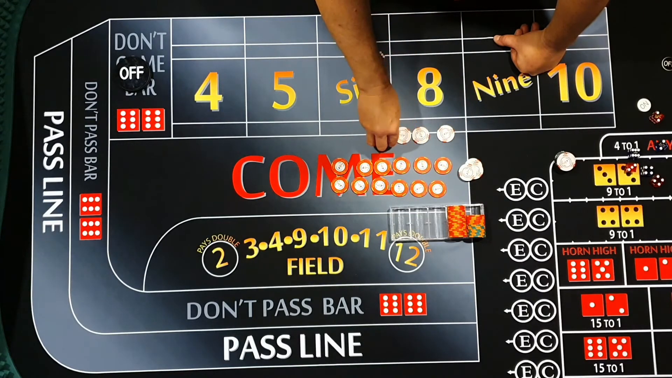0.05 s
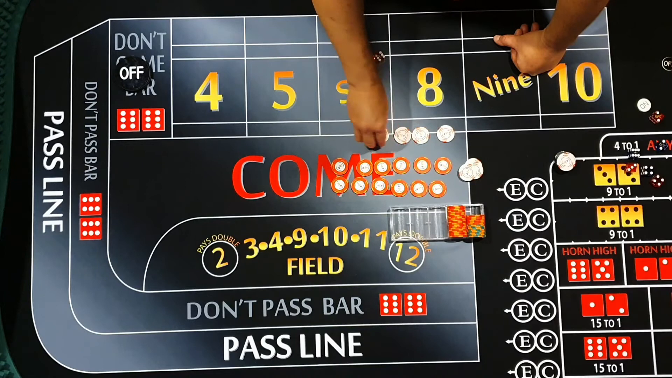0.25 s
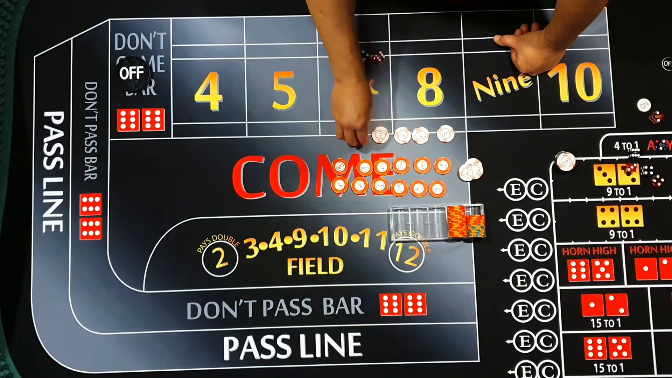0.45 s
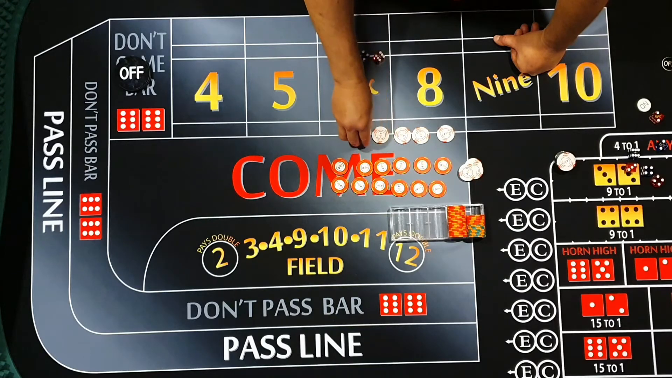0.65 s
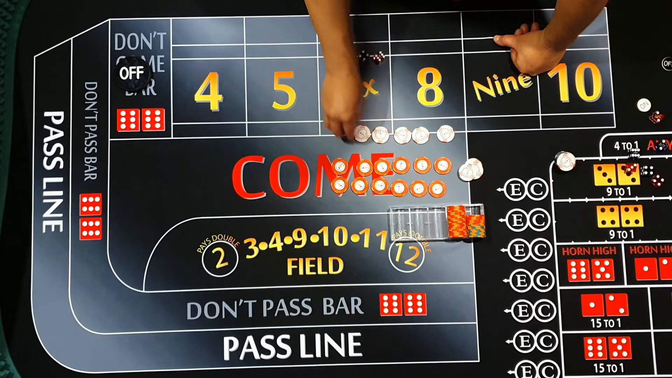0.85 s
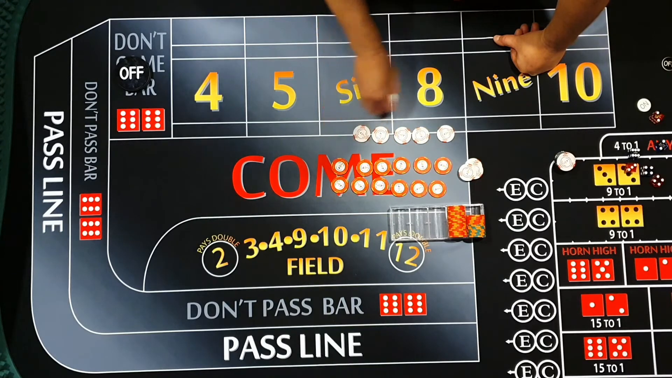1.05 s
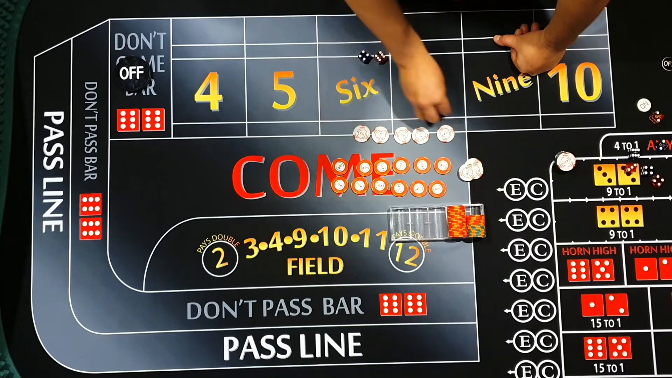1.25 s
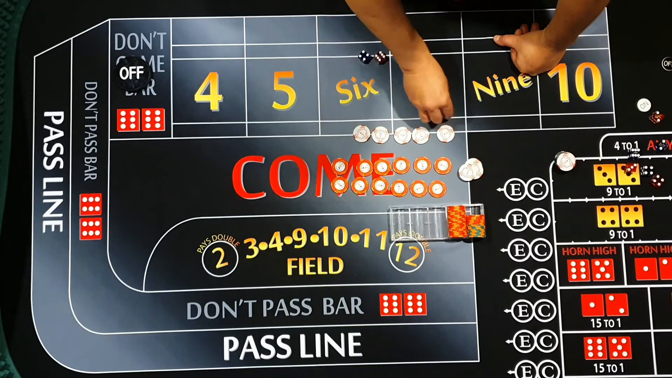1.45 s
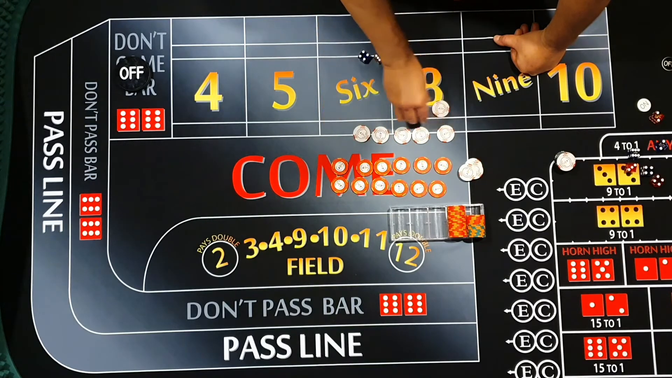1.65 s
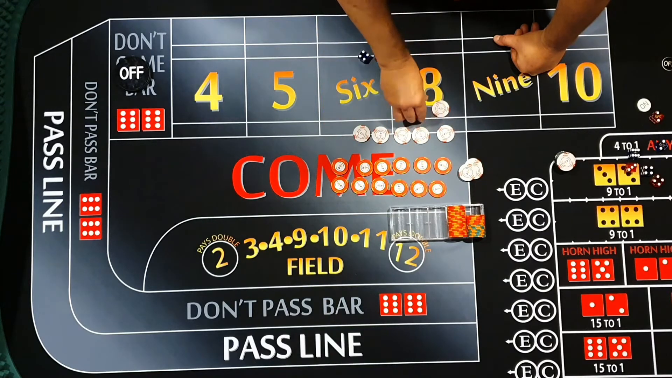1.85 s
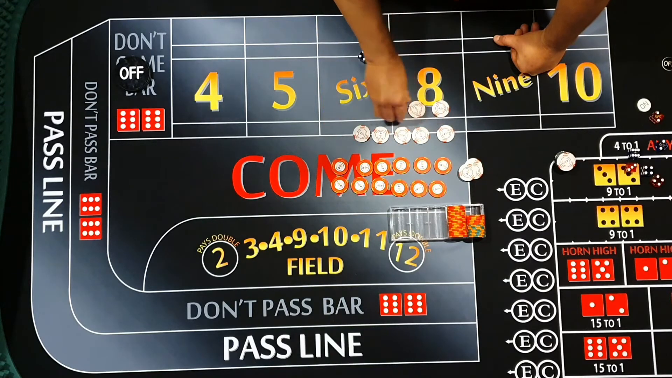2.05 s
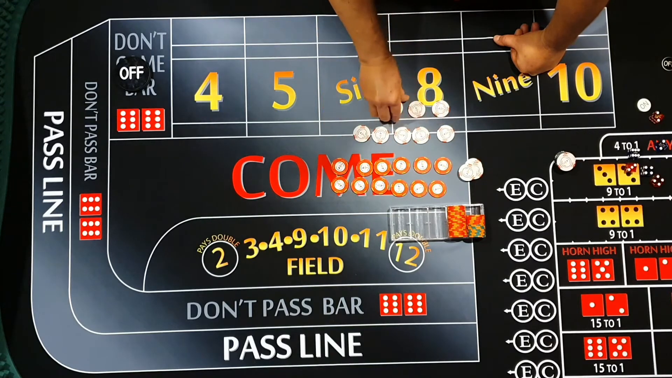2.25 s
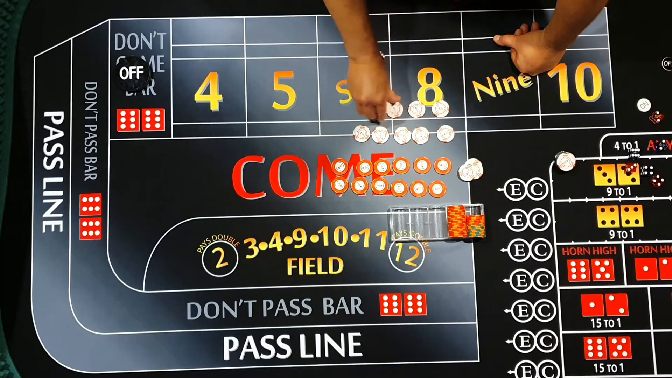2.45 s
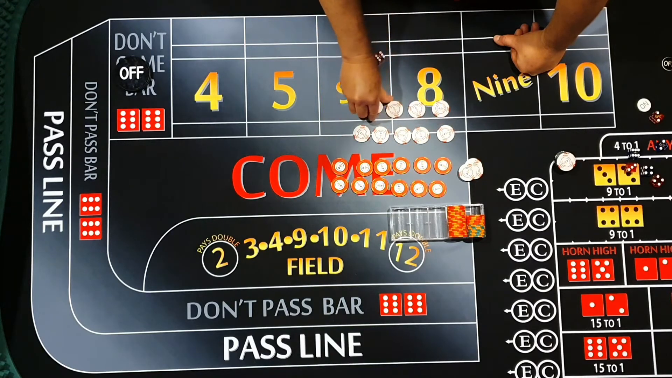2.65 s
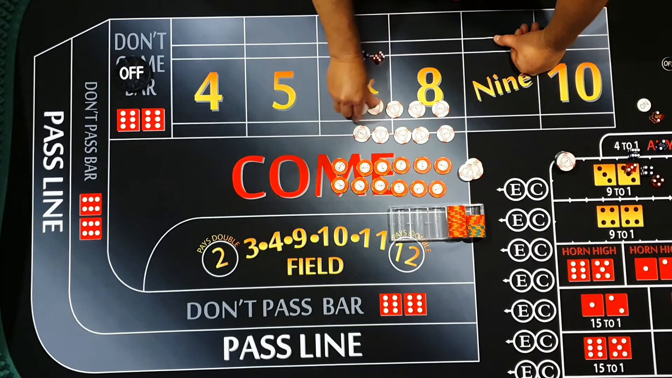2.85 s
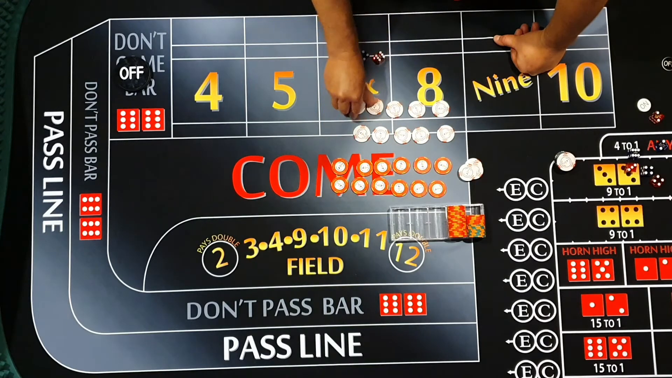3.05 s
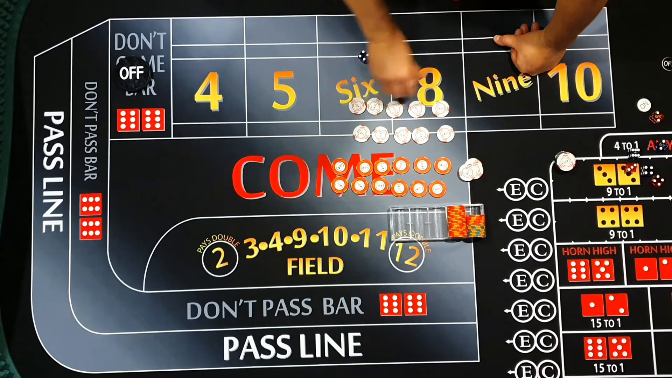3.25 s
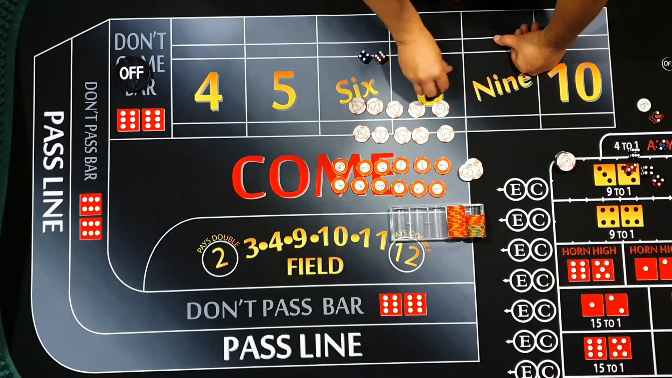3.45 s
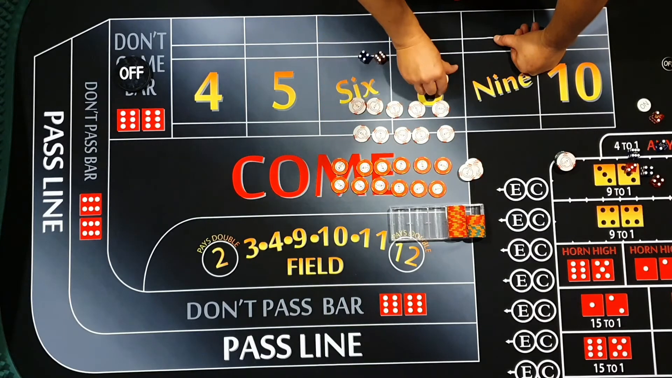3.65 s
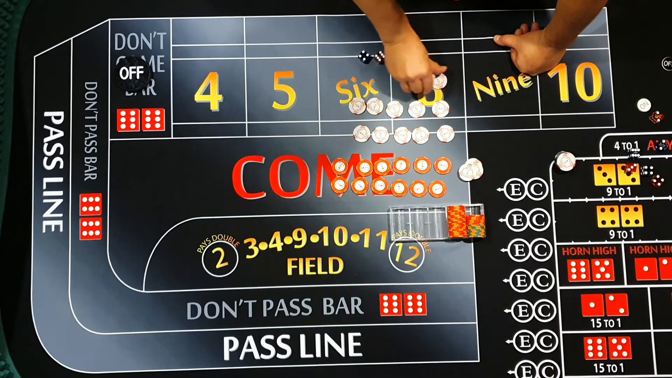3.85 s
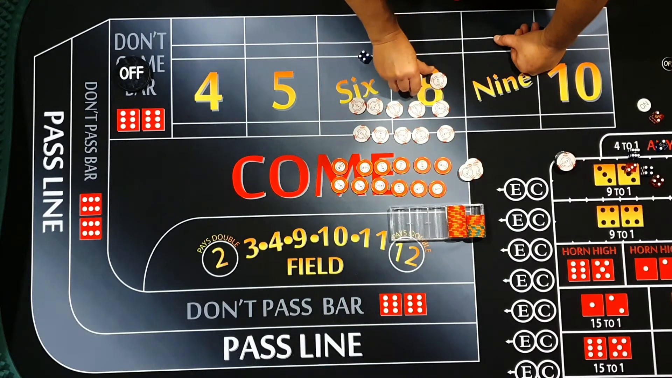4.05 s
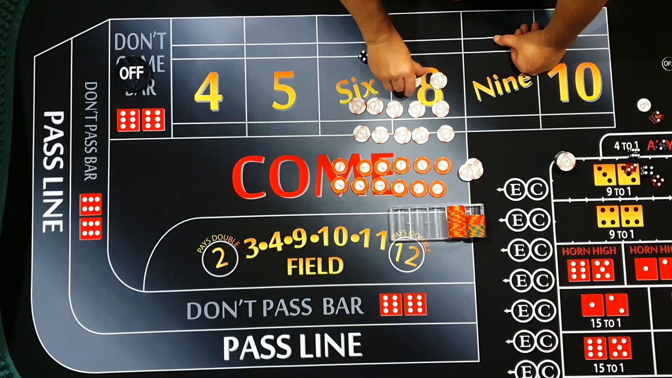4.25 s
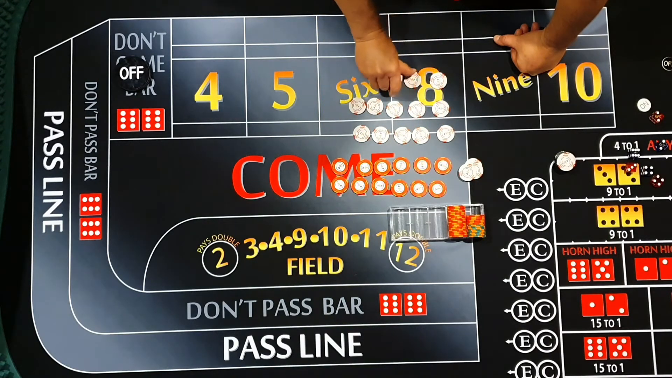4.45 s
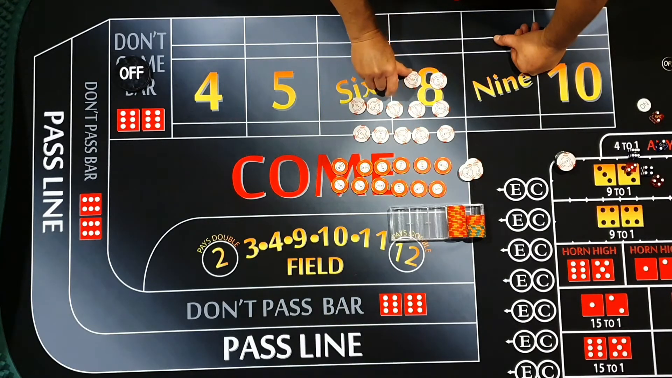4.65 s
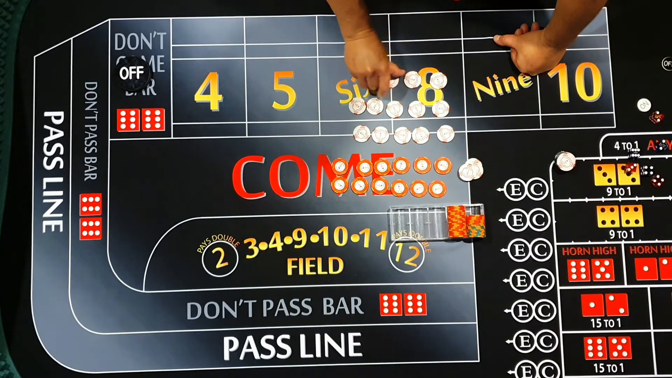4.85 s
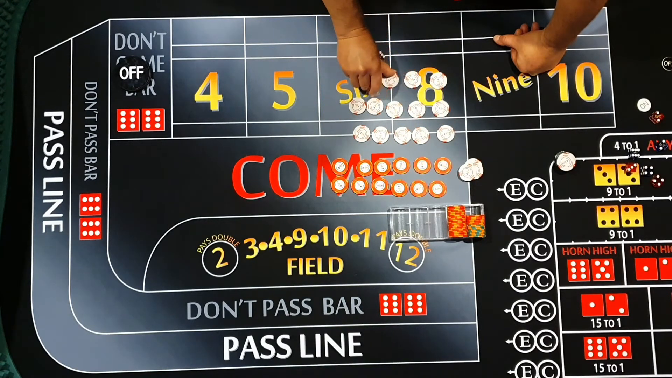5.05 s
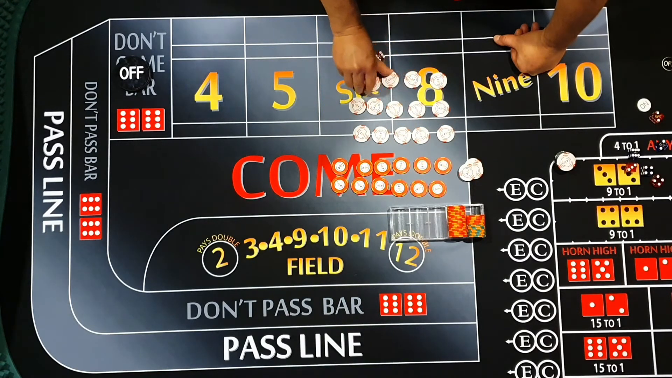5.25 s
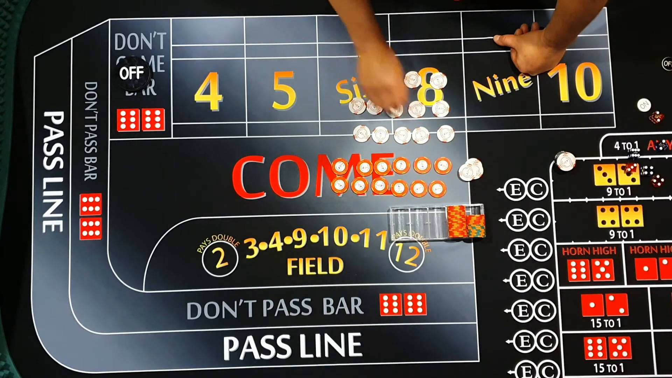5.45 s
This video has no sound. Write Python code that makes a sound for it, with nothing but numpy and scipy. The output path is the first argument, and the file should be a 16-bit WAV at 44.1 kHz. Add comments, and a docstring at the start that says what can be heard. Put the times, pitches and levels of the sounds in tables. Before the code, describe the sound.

Eleven casino chips click and knock onto a padded table about twice a second, growing firmer, over a soft hiss.

```python
"""A faint slide over cloth, then eleven clay chips knock down one by one on a craps table in a quiet room.
The dealer lands each chip on its edge; milliseconds later it snaps flat and knocks the board under the felt.
Spare chips tick in the hand, the hand bumps the felt, and thin rings drift in from across the room.
A stereo microphone, with the table dead centre, hears the knocks and the room's answer over a soft hiss;
its noise suppressor turns the hiss down in the pauses."""
import sys
import numpy as np
from scipy import signal
from scipy.fft import rfft, irfft, next_fast_len
from scipy.io import wavfile

SR = 44100
rng = np.random.default_rng(int(sys.argv[2]) if len(sys.argv) > 2 else 0)


def master_out(mix):
    """Clip the mix to full scale and print it as 16-bit PCM to the path in sys.argv[1]."""
    frames = np.transpose(np.atleast_2d(mix))
    ceiling = np.clip(frames, -1, 1)
    pcm = np.round(ceiling * 32767).astype(np.int16)
    wavfile.write(sys.argv[1], SR, pcm)


N = 242586

# chips set down on the felt: (time [s], edge level [dB], tipping time [s], face level [dB])
LANDINGS = [(0.1936, -33, 0.0032, -16.5), (0.7047, -31, 0.0039, -16), (1.4617, -23, 0.004, -19),
            (1.785, -22, 0.0082, -14.5), (2.3021, -38.5, 0.013, -15.5), (2.6102, -27, 0.0054, -15),
            (2.9593, -17.5, 0.011, -11), (3.7079, -20, .008, -10.5), (4.1311, -18.5, 0.012, -10.5),
            (4.6378, -17.5, 0.014, -10.5), (5.1196, -14.5, 0.023, -19.5)]
# the last three chips rock and land once more: (time [s], level [dB], ring against push [dB])
REBOUNDS = [(4.1548, -28, -17), (4.6608, -35, 1.5), (5.1532, -21, -17)]
# a chip's push on the padded board: (frequency [Hz], relative level [dB])
PUSH_SPECTRUM = [(25, -41), (90, -30.5), (170, -19.5), (250, -9), (450, -1.5), (800, -2), (1400, -3),
                 (2100, -5.5), (3200, -0.5), (4600, -15.5), (5600, -7), (7500, -38.5), (11000, -37),
                 (16000, -57.5)]
# a chip's ring, damped at once by the felt: (frequency [Hz], relative level [dB], t60 [s])
CHIP_MODES = [(2780, -8, 0.0097), (3824, 2, 0.013), (4296, 7.5, 0.0049), (4845, 4.5, 0.0071),
              (6680, -8, 0.014), (9050, -17, 0.014)]
# the board under the felt: (frequency [Hz], width [Hz], resonance gain [dB])
BOARD_MODES = [(128.4, 9.9, 7.5), (230.5, 34, 8), (242.4, 12.2, 7.5), (274, 57, -3), (313.5, 31, 7.5),
               (399, 3.7, 11.5), (423.4, 30, 5), (518, 59, 1), (579, 18, -1.5), (742, 128, -0.5),
               (951, 16, -1.5), (1032, 33, -1), (1234, 47, -6.5), (1356, 52, -6.5), (1906, 15, 0.5),
               (2220, 110, -27.5), (2800, 160, -7.5)]
# chips ticking in the hand: (time [s], ring level [dB], dry snap level [dB])
TICKS = [(.962, -59, -43), (1.109, -56, -48), (1.299, -55, -49), (3.285, -55, -67), (3.3018, -32.5, -64)]
# a loose chip against its neighbour: (frequency [Hz], relative level [dB], t60 [s])
LOOSE_CHIP_MODES = [(4900, -22, 0.023), (6070, 1, 0.0092), (7000, -9, 0.028), (9378, -21, 0.0099)]
# soft touches of the hand on the felt: (time [s], level [dB], pitch [Hz])
TOUCHES = [(1.298, -46.5, 1250), (1.4487, -40.5, 1460), (2.3031, -35.5, 650), (3.546, -46.5, 247),
           (3.563, -49, 183), (3.615, -58, 242)]
# a chip sliding over the cloth: (time [s], level [dB]) and (frequency [Hz], relative level [dB])
SLIDE_LEVELS = [(0, -59.5), (.08, -62), (.17, -63.5), (.22, -65)]
CLOTH_SPECTRUM = [(200, -15.5), (600, -10), (800, -2), (1150, -3), (1500, -16), (4000, -101), (16000, -53)]
# close scatter between the table's rails: (frequency [Hz], gain [dB]) and (frequency [Hz], t60 [s])
RAILS_COLOUR = [(100, 1.5), (400, -3.5), (1000, 4.5), (2500, 3.5), (4500, -7.5), (7000, -3.5), (15000, -21)]
RAILS_T60 = [(200, 0.28), (1000, 0.092), (4000, 0.074), (10000, 0.03)]
# the room's answer: (frequency [Hz], gain [dB]) and (frequency [Hz], t60 [s])
ROOM_COLOUR = [(60, 1), (250, -4), (700, -1.5), (1800, 4), (2800, -2.5), (4200, -12.5), (6500, -10),
               (15000, -6)]
ROOM_T60 = [(100, 0.54), (300, 0.27), (700, 0.53), (1500, 0.58), (3000, 0.58), (8000, 0.34)]
# thin rings from across the room: (time [s], pitch [Hz], level [dB], t60 [s])
FAR_RINGS = [(.76, 5150, -53, 0.41), (.79, 5490, -58.5, 0.78), (.82, 4120, -57, 0.7),
             (4.768, 4460, -51.5, .75), (4.799, 6760, -63, 0.85)]
# microphone hiss and room air: (frequency [Hz], relative level [dB])
HISS_SPECTRUM = [(25, -38), (60, -9), (130, -4), (350, -5.5), (800, 1), (1400, -2), (2500, -3.5),
                 (4500, -3), (6300, -1), (7500, -5), (10000, -4), (12500, -8), (14000, -5.5), (16000, -5.5)]
# the hiss in stereo: (frequency [Hz], correlation [0-1]) and (frequency [Hz], left over right [dB])
HISS_CORRELATION = [(30, 0.59), (200, 1), (6000, 1), (8000, 0.88), (15000, 0.43)]
HISS_BALANCE = [(200, 4.5), (6500, -1), (8200, 0.5), (15000, -2)]
# the noise suppressor: (upper band edge [Hz], threshold [dB], left depth [dB], right depth [dB])
SUPPRESSOR_BANDS = [(520, -49, 2.5, 3.5), (2830, -73, -1, 15.5), (7200, -66.5, 3.5, 6.5),
                    (19800, -66, 8, 23)]

# a firmer hand squeezes the felt harder: hardness at the usual level, and the extra level that doubles it
HARD_HZ, USUAL_DB, DOUBLING_DB = 3530, -14, 5
EDGE_HARDNESS = 0.82  # the edge's hardness over the face's
RING_DB, KNOCK_DB = -11, 4.5  # a chip's ring against its push; how loudly the table gives off a blow
CRACK_DB, CRACK_T60_S, CRACK_HZ = -41.5, 0.025, 9000  # a face's dry crack, alike for soft and firm chips
TOP_HZ = 15850  # the recorder's band limit


def chips():
    """Edge, face and any rebound strike one spot; the firmer a chip is set down, the brighter it is."""
    out = np.zeros(N)
    push = dispersed(pulse(PUSH_SPECTRUM), turn_hz=1450, late_hz=2500, spread_hz=270)
    t = np.arange(len(push)) / SR
    for start, edge_db, tip_s, face_db in LANDINGS:
        hard_hz = HARD_HZ * 2 ** ((max(edge_db, face_db) - USUAL_DB) / DOUBLING_DB)
        edge = (0, edge_db, EDGE_HARDNESS * hard_hz, RING_DB)
        face = (tip_s, face_db, hard_hz, RING_DB)
        rebounds = [(s - start, db, hard_hz, ring_db) for s, db, ring_db in REBOUNDS if 0 < s - start < .1]
        blows = np.zeros(SR // 5)
        for after_s, db, hz, ring_db in [edge, face] + rebounds:
            clack = amp(ring_db) * chip_ring(CHIP_MODES, len(t), scatter_db=2, detune=.025)
            add(blows, after_s, amp(db + KNOCK_DB) * cushioned(push + clack, hz))
        crack = amp(CRACK_DB - 60 * t / CRACK_T60_S) * rng.standard_normal(len(t))
        add(blows, tip_s, cushioned(crack, CRACK_HZ))
        add(out, start, signal.fftconvolve(blows, path_to_microphone(room_db=-.5)))
    return board(out)


def chip_ring(modes, size, scatter_db, detune):
    """A struck chip rings in damped modes, at slightly new strengths and pitches for each blow."""
    out, t = np.zeros(size), np.arange(size) / SR
    for k, (hz, db, t60) in enumerate(modes):
        db += scatter_db * rng.standard_normal()
        hz *= 1 + detune * rng.standard_normal()
        out += (-1) ** k * amp(db - 60 * t / t60) * np.sin(2 * np.pi * hz * t)
    return out


def cushioned(blow, hard_hz):
    """Felt spreads the force in time: the softer the contact, the less treble."""
    return filtered(blow, lambda hz: 1 / (1 + 1j * hz / hard_hz) ** 2)


def dispersed(blow, turn_hz, late_hz, spread_hz):
    """Bending waves disperse: the sharp top of a blow leaves the board first, the middle trails it."""
    low_delay = lambda f: (1j * f - turn_hz) / (1j * f + turn_hz)
    middle_delay = lambda f: np.exp(-2j * np.arctan2(f * spread_hz, late_hz ** 2 - f ** 2))
    return filtered(blow, lambda f: low_delay(f) * middle_delay(f))


def board(blow):
    """The board under the felt passes a blow on and rings at its own resonances."""
    mode = lambda f, hz, width: 1j * f * width / (hz ** 2 - f ** 2 + 1j * f * width)
    return filtered(blow, lambda f: 1 + sum(amp(db) * mode(f, hz, width) for hz, width, db in BOARD_MODES))


def hand():
    """Spare chips tick in the dealer's fingers, and the hand bumps the felt with little room sound."""
    out, t = np.zeros(N), np.arange(SR // 10) / SR
    for s, ring_db, snap_db in TICKS:
        bright_noise = np.diff(rng.standard_normal(len(t) + 1)) / 2
        snap = bright_noise * amp(-60 * t / 0.0091)
        ring = chip_ring(LOOSE_CHIP_MODES, len(t), scatter_db=3, detune=0.0041)
        add(out, s, amp(ring_db) * ring + amp(snap_db) * snap)
    for s, db, hz in TOUCHES:
        bump = np.sin(2 * np.pi * hz * t) * np.exp(-hz * t / 1.1)  # dies within a few cycles
        add(out, s, amp(db) * signal.fftconvolve(bump, path_to_microphone(room_db=-23)))
    return out


def slide():
    """Cloth fibres catch and let go of a sliding chip in many tiny slips."""
    slips = rng.standard_normal(N) * (rng.random(N) < 2500 / SR)  # about 2500 a second
    rub = unit(filtered(slips, lambda hz: amp(along(CLOTH_SPECTRUM, hz))))
    level_db = np.interp(np.arange(N) / SR, *np.transpose(SLIDE_LEVELS), right=-120)
    return amp(level_db) * rub


def path_to_microphone(room_db):
    """From one spot on the felt, sound arrives directly, off the nearby rails and from the room."""
    room = echoes(ROOM_COLOUR, ROOM_T60, build_s=0.0086)
    far_wall = cushioned(echoes(RAILS_COLOUR, RAILS_T60, build_s=0.0043), hard_hz=3000)
    add(room, .056, amp(-10) * far_wall)  # a dull, smeared copy of the knock, 56 ms late
    rails = echoes(RAILS_COLOUR, RAILS_T60, build_s=0.00037)
    path = rails + amp(room_db) * room
    path[0] += 1  # direct sound
    return path


def echoes(colour, t60s, build_s):
    """Dense reflections build up, then die at each frequency's own speed."""
    hz, t, noise = signal.stft(rng.standard_normal(SR * 3 // 4), SR, nperseg=128)
    t60 = np.maximum(along(t60s, hz), 1e-3)[:, None]
    energy = SR * t60 / np.log(1e6)
    tail = signal.istft(noise * amp(-60 * t / t60) / np.sqrt(energy), SR, nperseg=128)[1]
    tail = filtered(tail, lambda f: amp(along(colour, f)))
    build_up = 1 - np.exp(-(np.arange(len(tail)) / SR / build_s) ** 2)
    return tail * build_up


def far_rings():
    """Across the room, thin, slightly grainy tones swell softly and fade."""
    out, t = np.zeros(N), np.arange(SR) / SR
    swell = 1 - np.exp(-t / .05)
    for s, hz, db, t60 in FAR_RINGS:
        tone = unit(filtered(rng.standard_normal(SR), lambda f: 1 / (1 + ((f - hz) / 60) ** 2)))
        add(out, s, amp(db - 60 * t / t60) * swell * tone)
    return out


def hiss():
    """Microphone hiss and room air: leaning left low down, wider and slightly right at the very top."""
    def mid_side_gains(hz):
        angle = np.arccos(np.clip(along(HISS_CORRELATION, hz), -1, 1)) / 2
        return amp(along(HISS_SPECTRUM, hz)) * [np.cos(angle), np.sin(angle)]

    mid, side = filtered(rng.standard_normal((2, N)), mid_side_gains)
    balance = lambda hz: amp(np.outer([.5, -.5], along(HISS_BALANCE, hz)))
    return amp(-62) * unit(filtered(np.array([mid + side, mid - side]), balance))


def noise_suppressor(x):
    """Each band moves to its pause gain as its level falls below the threshold; the right sinks most."""
    out, lower = np.zeros_like(x), np.zeros_like(x)
    for edge_hz, threshold_db, left_db, right_db in SUPPRESSOR_BANDS:
        below_edge = filtered(x, lambda hz: 1 / (1 + (hz / edge_hz) ** 12))
        band, lower = below_edge - lower, below_edge
        power = lagged(np.mean(band ** 2, axis=0), lag_s=0.032)
        opening = lagged(power / (power + amp(threshold_db) ** 2), lag_s=0.011)
        out += band * amp(np.outer([left_db, right_db], opening - 1))
    return out


def pulse(spectrum, size=4096):
    """The shortest causal pulse with this spectrum, peak 1."""
    magnitude = amp(along(spectrum, np.fft.rfftfreq(size, 1 / SR)))
    cepstrum = irfft(np.log(magnitude))
    cepstrum[1:size // 2] *= 2  # fold to minimum phase
    cepstrum[size // 2 + 1:] = 0
    shape = irfft(np.exp(rfft(cepstrum)))
    return shape / np.abs(shape).max()


def amp(db):
    """Decibels to gain."""
    return 10 ** (np.asarray(db) / 20)


def unit(x):
    """x at rms 1."""
    return x / np.sqrt(np.mean(x ** 2) + 1e-20)


def along(points, hz):
    """(frequency [Hz], value) points read on a log axis."""
    freqs, values = np.transpose(points)
    return np.interp(np.log(hz + 1), np.log(freqs + 1), values)


def filtered(x, response):
    """x through a complex frequency response."""
    size = x.shape[-1]
    padded = next_fast_len(size + SR // 10)
    hz = np.fft.rfftfreq(padded, 1 / SR)
    return irfft(rfft(x, padded) * response(hz), padded)[..., :size]


def lagged(x, lag_s):
    """A one-pole running mean."""
    keep = np.exp(-1 / (lag_s * SR))
    return signal.lfilter([1 - keep], [1, -keep], x)


def add(track, s, sound):
    """Mix a sound into the track at time s."""
    part = track[max(round(s * SR), 0):][:len(sound)]
    part += sound[:len(part)]


def scene():
    """The table sits dead centre before the microphone; only the hiss has width."""
    return chips() + hand() + slide() + far_rings() + hiss()


def record(dry):
    """The recorder quiets the pauses and keeps nothing above its band limit."""
    return filtered(noise_suppressor(dry), lambda hz: hz < TOP_HZ)


dry = scene()
out = record(dry)
master_out(out)
```